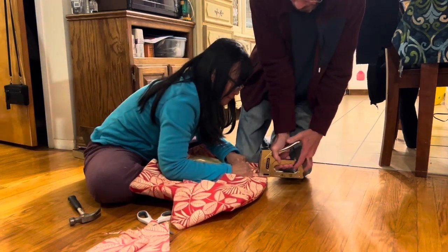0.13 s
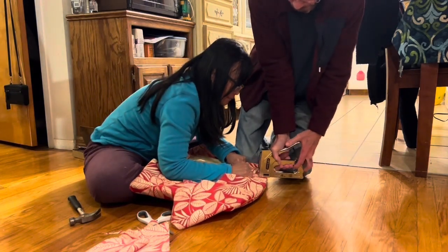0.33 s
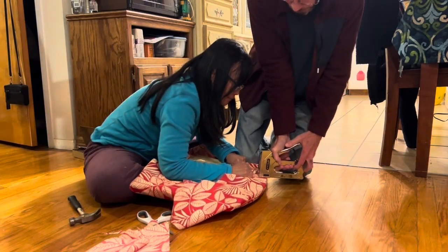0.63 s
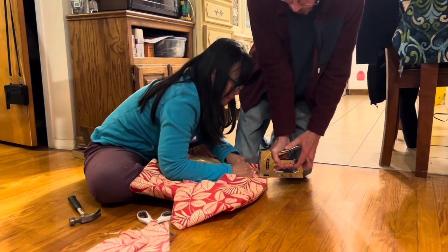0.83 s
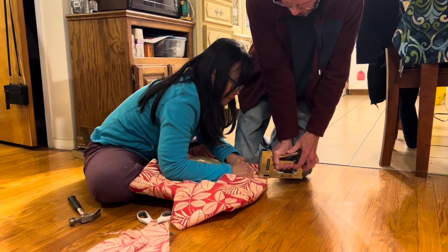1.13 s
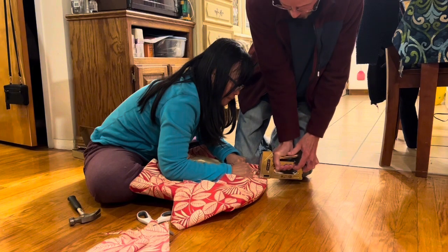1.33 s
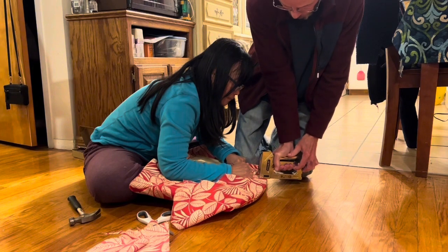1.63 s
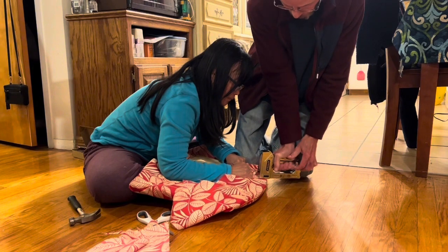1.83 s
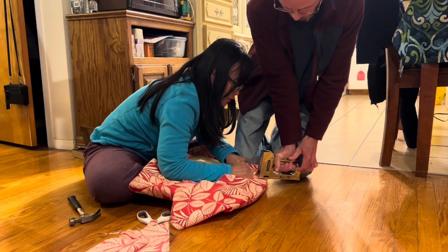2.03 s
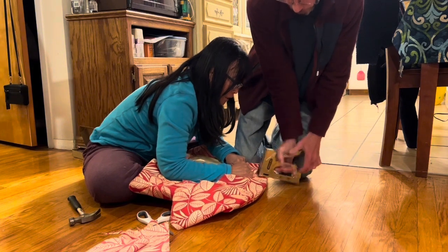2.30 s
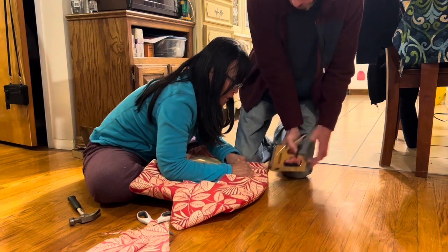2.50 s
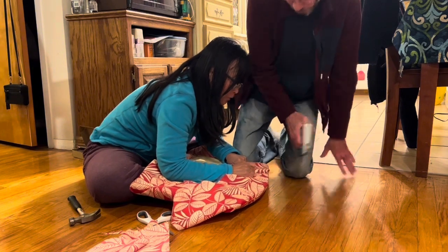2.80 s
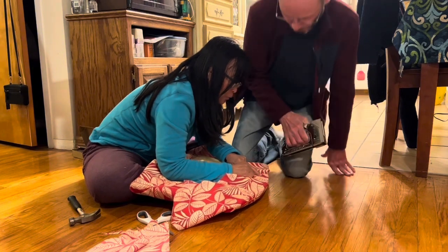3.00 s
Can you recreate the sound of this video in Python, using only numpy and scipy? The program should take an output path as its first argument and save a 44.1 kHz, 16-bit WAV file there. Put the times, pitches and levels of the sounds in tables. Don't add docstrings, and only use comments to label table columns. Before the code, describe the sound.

A hand staple gun is readied in a quiet furnished room with faint low appliance rumble. Small lever ticks come around 0.4-0.6 s, with barely audible cloth slides near 0.8 and 1.7 s. At 2.5 s the latch clicks and the blade slams, a hard crack with short steel ring and room echo. Faint clicks follow from 2.95 s; at 3.08 s the tool clunks onto boards, thudding as it rocks.

```python
import sys
import numpy as np
from scipy import signal
from scipy.fft import rfft, irfft, next_fast_len
from scipy.io import wavfile
from scipy.ndimage import uniform_filter1d, minimum_filter1d, map_coordinates

SR = 44100
rng = np.random.default_rng(int(sys.argv[2]) if len(sys.argv) > 2 else 0)


def invert_db(level):
    return 10 ** (np.asarray(level, dtype=float) / 20)


def transcribe(u):
    v = np.clip(np.atleast_2d(u).T, -1, 1)
    q = np.round(v * 32767).astype(np.int16)
    wavfile.write(sys.argv[1], SR, q)


N = 138915

EDGES = 20 * 2 ** np.arange(0, 9.9, .4)

# (frequency [Hz], level [dB])
FLOOR_COLOUR = [(20, -29), (70, 3.5), (160, -13.5), (480, -17.5), (952, -37), (3000, -48.5), (11500, -51),
                (16500, -75)]
FLOOR_DB, FLOOR_PATCHY_DB, FLOOR_PATCH_S = -57.5, .8, .1
# (frequency [Hz], width [Hz], level [dB])
FLOOR_BANDS = [(113, 9.7, -11), (207, 7, 2.5), (256, 6, -8), (306, 11, -5), (360, 8, 2), (423, 9, -5),
               (495, 10, -9), (556, 9, -8)]
FLOOR_BANDS_DB = -69
# (frequency [Hz], likeness [-1..1])
FLOOR_LIKENESS = [(60, 1), (180, 0.86), (550, 0.59), (1650, 0.25), (4970, 0.74), (15000, 0.061)]

RUSTLE_HZ, RUSTLE_DB, RUSTLE_PATCHY_DB = (990, 2650), -88.5, 2.5
# (time [s], half length [s], level over the rustle [dB], frequency [Hz])
SHIFTS = [
    (0.812, 0.06, 14.5, 3450),
    (0.816, .08, 10, 1800),
    (1.7, 0.056, 10, 3500),
]

# (time [s], level [dB], frequency [Hz], t60 [s])
PINGS = [(0.041, -59, 1750, .006), (0.513, -71, 5550, 0.097), (2.5124, -28.5, 3160, .04),
         (.367, -68, 2400, .008), (.367, -71.5, 4500, .006), (.378, -75, 2150, .03), (.539, -68, 5500, .03),
         (0.512, -53, 1330, 0.018), (0.581, -58, 1490, 0.016), (1.33, -75, 3400, 0.047),
         (1.336, -69.5, 2700, 0.033), (2.539, -35, 910, 0.032), (2.5433, -27.5, 880, 0.053),
         (2.546, -32, 5600, .02), (2.5453, -33.5, 7500, 0.028), (3.0586, -19, 1290, 0.018),
         (3.0586, -24.5, 880, .006), (3.059, -30, 2600, .006), (3.059, -32, 4700, 0.011),
         (3.0778, -9.5, 1301, 0.033), (3.0775, -14, 790, 0.025), (3.0772, -14, 2600, .012),
         (3.0769, -8, 11650, 0.01)]

# (frequency [Hz], likeness [-1..1])
ROOM_LIKENESS = [(60, 1), (240, 0.87), (950, 0.15), (3770, 0.23), (15000, 0.39)]
# (frequency [Hz], t60 [s])
ROOM_T60 = [(60, 0.16), (250, 0.35), (1000, 0.42), (4000, 0.43), (9000, 0.39), (12000, 0.25), (15000, 0.29)]
# (frequency [Hz], level [dB])
ROOM_COLOUR = [(60, -5), (300, 6), (1500, 1.5), (6000, -3), (15000, -0.5)]
ROOM_DB, ROOM_GAP_S, ROOM_EARLY_DB = -26, .0115, -9

# (time [s], peak [dB], rattle [s], tilt [dB per octave])
TICKS = [
    (.3655, -51.5, 0.0054, 9.5),
    (.5063, -43, 0.0051, 2.5),
    (.5115, -45.5, 0.0074, -2),
    (.524, -55, .006, -3),
    (.537, -58, .008, 0),
    (.556, -66, .01, 0),
    (.579, -64.5, 0.0098, -2),
]
# (frequency [Hz], level [dB])
TICK_COLOUR = [(500, -19), (1000, -4.5), (2000, 8), (4500, 2), (9000, -4), (16500, -11)]
# (frequency [Hz], level [dB], t60 [s])
TICK_RING = [(2180, 4, 0.012), (4170, 3, 0.013), (5550, -7, 0.056)]

# (time [s], length [s], from [Hz], to [Hz], level [dB])
SQUEAK = (1.55, .04, 9350, 9800, -86)

# (time [s], peak [dB], rattle [s], tilt [dB per octave])
LATCH = [
    (2.5055, -11.5, 0.0018, 4),
    (2.5075, -17.5, 0.0034, -3.5),
    (2.5125, -29.5, .003, -1),
    (2.5185, -29.5, 0.0018, -4.5),
    (2.5275, -36, .003, 4.5),
    (2.5385, -31, 0.0035, 3.5),
    (2.5435, -31.5, 0.0015, -7),
]
# (frequency [Hz], level [dB])
LATCH_COLOUR = [(300, -19.5), (800, -25), (1900, 0), (3300, 5), (5300, -2), (8500, 3), (11500, -14),
                (16500, -16.5)]
# (frequency [Hz], level [dB], t60 [s])
LATCH_RING = [(1640, -9.5, 0.096), (1880, -4, 0.094), (2270, -16.5, 0.068), (3160, -6.5, 0.059),
              (3585, -2.5, 0.047), (6900, -16, 0.068), (8360, -3.5, .04), (8300, -12.5, 0.04)]

# (time [s], peak [dB], rattle [s], tilt
# [dB per octave])
BLADE = [
    (2.5531, -7.5, 0.00042, 3.5),
    (2.5536, -6, 0.00036, 2.5),
    (2.554, -7, 0.00068, 6),
    (2.5561, -7, .001, 2.5),
    (2.558, -8, 0.00086, 0),
    (2.5598, -14.5, .001, 4.5),
    (2.5665, -12.5, .002, -0.5),
]
# (frequency [Hz], level [dB])
BLADE_COLOUR = [(60, -14.5), (300, -7), (1130, -1.5), (2500, -2.5), (4300, -6.5), (8750, -11.5),
                (12000, -10.5), (16500, -21)]
# (frequency [Hz], level [dB], t60 [s])
BLADE_RING = [(1246, 1, 0.0061), (1630, -3, 0.04), (2600, -20, 0.02), (2800, 0, .01), (3570, -5, 0.029)]
# (time [s], level [dB], frequency [Hz], t60 [s])
STRIKE = [
    (2.555, 6.5, 3186, 0.0029),
    (2.5547, 1.5, 1242, 0.0035),
]

# (time [s], level [dB])
SEAT_THUD = [
    (2.556, -36),
    (2.566, -29),
]
# (frequency [Hz], level [dB], t60 [s])
SEAT_RING = [(62, 5.5, 0.16), (105, -12.5, 0.04), (315, -11.5, 0.008), (490, -16.5, .05)]
THUD_CONTACT_HZ, THUD_LOW_HZ = 480, 68

# (frequency [Hz], level [dB], t60 [s])
FRAME_RING = [(738, -42, 0.28), (1204, -34, 0.3), (1604, -36.5, .18), (1860, -37, 0.23),
              (2380, -45.5, 0.15), (2455, -43, .18), (2730, -38, .18), (2900, -44, 0.3), (3661, -41, .16)]
FRAME_S = 2.5665

# (time [s], peak [dB], rattle [s], tilt [dB per octave])
CLICKS = [
    (2.9507, -46.5, 0.0023, -3),
    (2.9965, -51, 0.006, -0.5),
    (3.0445, -41.5, 0.013, -0.5),
    (3.0555, -27.5, 0.013, 4),
]
# (frequency [Hz], level [dB])
CLICK_COLOUR = [(700, -45.5), (2000, 0), (3500, 0.5), (6500, -6), (12000, -8.5), (16500, -20.5)]
# (frequency [Hz], level [dB], t60 [s])
CLICK_RING = [(2770, 4.5, 0.0024), (4430, -5.5, 0.0079)]

# (time [s], peak [dB], rattle [s], tilt [dB per octave])
SET_DOWN = [
    (3.0765, -5, 0.0038, 5.5),
    (3.0795, -9.5, 0.0028, 4),
    (3.083, -14, 0.0016, 2),
    (3.0868, -15.5, 0.0021, -0.5),
    (3.0905, -18, 0.0032, 7.5),
]
# (frequency [Hz], level [dB])
SET_DOWN_COLOUR = [(200, -13), (500, -7), (1300, -5.5), (2500, -5), (5000, -14), (8400, -17.5),
                   (11700, -22.5), (16500, -23.5)]
# (frequency [Hz], level [dB], t60 [s])
SET_DOWN_RING = [(827, -11.5, 0.012), (1290, -2.5, 0.012), (1877, -14, 0.013), (2720, -10.5, 0.02),
                 (3650, -14, 0.0052), (4700, -4.5, 0.012), (6500, -15, 0.0087), (8530, -13, 0.0082)]

BOARD_THUD_S = [3.0822, 3.0859, 3.0914, 3.095, 3.0993, 3.1032, 3.109, 3.1144, 3.1165, 3.1205, 3.133, 3.1455]
BOARD_THUD_DB = [-15.5, -15, -7.5, -16, -15.5, -19, -24.5, -19, -19, -19, -26, -21]
# (frequency [Hz], level [dB], t60 [s])
BOARD_RING = [(79, -25, 0.2), (113, -9.5, 0.065), (170, -10, 0.036), (241, 1.5, 0.022), (323, -1, 0.024),
              (440, -12, 0.012)]

# (frequency [Hz], left lead [radians])
PORT_LEAD = [(60, -.15), (260, -1.0), (1400, -.7), (3100, .6), (7900, 0.7), (10800, -3.8), (13200, -9),
             (16500, -12.8)]
# (frequency [Hz], left over right [dB])
PORT_BALANCE = [(60, -0.5), (180, 3.5), (550, -.5), (1650, 0), (4970, 1), (15000, -1)]
# (from [Hz], to [Hz])
DEAD_BANDS = [(9620, 10880), (13020, 14520), (15800, 17500)]
ATTACK_RISE, ATTACK_OPEN_S = 4, .005
DUCK_FROM_DB, DUCK_SHARE, DUCK_ATTACK_S, DUCK_HOLD_S, DUCK_BACK_DB_PER_S = -23.5, 0.59, 0.016, 0.14, 105
TOP, LOW_CUT_HZ, CUTOFF_HZ = .86, 35, 16900


def at_hz(points, hz):
    points = np.array(points)
    return np.interp(np.log(hz), np.log(points[:, 0]), points[:, 1])


def bands(x):
    for k, (low, high) in enumerate(zip(EDGES, EDGES[1:])):
        band_pass = signal.butter(2, [low, high], "band", fs=SR, output="sos")
        yield np.sqrt(low * high), signal.sosfilt(band_pass, x[k % len(x)])


def ring(x, modes):
    out = 0
    for hz, level_db, t60 in modes:
        r, w = invert_db(-60 / (t60 * SR)), 2 * np.pi * hz / SR
        gain = invert_db(level_db) * np.sin(w)
        out = out + signal.lfilter([0, gain], [1, -2 * r * np.cos(w), r * r], x + 1e-18)
    return out


def pair(hz, likeness, mid_side):
    alike = np.clip(at_hz(likeness, hz), -1, 1)
    return np.sqrt(1 + alike) * mid_side[0] + np.sqrt(1 - alike) * mid_side[1] * [[1], [-1]]


def coloured(x, colour, tilt_db):
    size = 2 ** 14
    hz = np.maximum(np.arange(size // 2 + 1) * SR / size, 20)
    fold = irfft(np.log(invert_db(at_hz(colour, hz) + tilt_db * np.log2(hz / 3000))))
    fold[1:size // 2] *= 2
    fold[size // 2 + 1:] = 0
    return irfft(rfft(x, size) * np.exp(rfft(fold)))[:len(x)]


def wander():
    steps = int((N + SR) / SR / FLOOR_PATCH_S) + 2
    return map_coordinates(rng.standard_normal(200), [np.linspace(0, steps, N + SR)], order=3)


def near_far(x, far_db):
    return x * invert_db(np.array([[0], [far_db]]))


def blows(events, colour, modes, ring_db, room_db):
    out, t = np.zeros((2, N + SR)), np.arange(SR // 4) / SR
    for s, level_db, rattle_s, tilt_db in events:
        contacts = rng.laplace(size=len(t)) * np.exp(-t / rattle_s) * np.minimum(t / .0003, 1)
        crack = coloured(contacts, colour, tilt_db)
        body = ring(contacts, modes)
        sound = crack / np.abs(crack).max() + invert_db(ring_db) * body / np.abs(body).max()
        even = coloured(1. * (t == 0), colour, tilt_db)
        to_room = invert_db(room_db) * (.1 * sound + even * sound.std() / even.std())
        start = int(s * SR)
        out[:, start:start + len(t)] += invert_db(level_db) * np.array([sound, to_room])
    return out[:, :N]


def taps(events):
    out = np.zeros(N)
    for s, level_db, hz, t60 in events:
        push = np.zeros(N)
        start, length = int(s * SR), int(SR / hz)
        cycle = np.sin(2 * np.pi * np.arange(length) / length)
        push[start:start + length] = -np.hanning(length) * cycle * 4 / length
        out += ring(push, [(hz, level_db, t60)])
    return out


def thuds(events, modes):
    pushes, r = np.zeros(N), np.exp(-2 * np.pi * THUD_CONTACT_HZ / SR)
    for s, level_db in events:
        pushes[int(s * SR)] = invert_db(level_db)
    soft = signal.lfilter([(1 - r) ** 2], [1, -2 * r, r * r], pushes + 1e-18)
    return signal.lfilter(*signal.butter(2, THUD_LOW_HZ, "high", fs=SR), ring(soft, modes))


def floor():
    wide, narrow = 0, 0
    for hz, band in bands(rng.standard_normal((2, 2, N + SR))):
        level = invert_db(at_hz(FLOOR_COLOUR, hz) + FLOOR_PATCHY_DB * wander())
        wide = wide + (level * pair(hz, FLOOR_LIKENESS, band))[:, SR:]
    for hz, width_hz, level_db in FLOOR_BANDS:
        band = ring(rng.standard_normal((2, N + SR)), [(hz, level_db, 2.2 / width_hz)])
        narrow = narrow + pair(hz, FLOOR_LIKENESS, band)[:, SR:] * width_hz
    return invert_db(FLOOR_DB) * wide / wide.std() + invert_db(FLOOR_BANDS_DB) * narrow / narrow.std()


def rustle():
    grains = rng.laplace(size=(2, N + SR)) * invert_db(RUSTLE_PATCHY_DB * wander())
    band_pass = signal.butter(4, RUSTLE_HZ, "band", fs=SR, output="sos")
    band = signal.sosfilt(band_pass, grains + grains[0])[:, SR:]
    out = band / band.std()
    for s, half_s, level_db, hz in SHIFTS:
        slide = ring(grains[:, SR:], [(hz, 0, .006)])
        swell = np.exp(-((np.arange(N) / SR - s) / half_s) ** 2)
        out = out + invert_db(level_db - 9) * slide / slide.std() * swell
    return invert_db(RUSTLE_DB) * out


def pings():
    return near_far(taps(PINGS), -16)


def room(x):
    t = np.arange(SR) / SR
    onset = np.where(t < ROOM_GAP_S, invert_db(ROOM_EARLY_DB) * (t > .002), 1)
    echo = 0
    for hz, band in bands(rng.standard_normal((2, 2, SR))):
        decay = invert_db(at_hz(ROOM_COLOUR, hz) - 60 * t / at_hz(ROOM_T60, hz))
        echo = echo + decay * pair(hz, ROOM_LIKENESS, band)
    return invert_db(ROOM_DB) * signal.fftconvolve(x[None], onset * echo, axes=1)[:, :N]


def ticks():
    return blows(TICKS, TICK_COLOUR, TICK_RING, ring_db=-17.0, room_db=-13.0)


def squeak():
    s, length, low_hz, high_hz, level_db = SQUEAK
    u = np.clip((np.arange(N) / SR - s) / length, 0, 1)
    phase = 2 * np.pi * np.cumsum(low_hz + (high_hz - low_hz) * u) / SR
    return invert_db(level_db) * np.sin(np.pi * u) * np.sin(phase)


def latch():
    return blows(LATCH, LATCH_COLOUR, LATCH_RING, ring_db=-9.5, room_db=-11.0)


def blade():
    slam = blows(BLADE, BLADE_COLOUR, BLADE_RING, ring_db=-10.5, room_db=0.83)
    return slam + near_far(taps(STRIKE), -16)


def seat():
    return near_far(thuds(SEAT_THUD, SEAT_RING), -7)


def frame():
    out = 0
    for mode in FRAME_RING:
        start = int((FRAME_S - rng.uniform(0, .008)) * SR)
        out = out + ring(1. * (np.arange(N) == start), [mode])
    return near_far(out, -12)


def clicks():
    return blows(CLICKS, CLICK_COLOUR, CLICK_RING, ring_db=-0.5, room_db=-6.5)


def set_down():
    return blows(SET_DOWN, SET_DOWN_COLOUR, SET_DOWN_RING, ring_db=-5.0, room_db=-7.5)


def boards():
    return near_far(thuds(zip(BOARD_THUD_S, BOARD_THUD_DB), BOARD_RING), -18)


def ports(x):
    size = next_fast_len(N + SR)
    hz = np.maximum(np.arange(size // 2 + 1) * SR / size, 20)
    half = invert_db(at_hz(PORT_BALANCE, hz) / 2) * np.exp(.5j * at_hz(PORT_LEAD, hz))
    return irfft(rfft(x, size) * np.array([half, 1 / half]), size)[:, :N]


def scene():
    tool = ticks() + clicks() + latch() + blade() + set_down()
    near, far = tool + seat() + boards() + pings() + frame() + squeak()
    reverb = room(far) * invert_db(np.array([[.3], [-.3]]))
    return ports(near) + reverb + rustle() + floor() * invert_db(np.array([[1.1], [-1.1]]))


def duck(x):
    level_db = 10 * np.log10(uniform_filter1d(np.mean(x ** 2, axis=0), size=128) + 1e-12)
    over = DUCK_SHARE * np.maximum(level_db - DUCK_FROM_DB, 0)
    hold = int(DUCK_HOLD_S * SR)
    held = -minimum_filter1d(-np.r_[np.zeros(hold), over], size=hold)[hold // 2:hold // 2 + N]
    slope = DUCK_BACK_DB_PER_S * np.arange(N) / SR
    cut_db = np.maximum.accumulate(held + slope) - slope
    r = np.exp(-1 / (DUCK_ATTACK_S * SR))
    return x * invert_db(-signal.lfilter([1 - r], [1, -r], cut_db))


def empty_bands(x):
    notched, bright = x, np.gradient(x[0]) ** 2
    for edges in DEAD_BANDS:
        notch = signal.ellip(5, .5, 50, edges, "bandstop", fs=SR, output="sos")
        notched = signal.sosfilt(notch, notched)
    usual = signal.lfilter([.001], [1, -.999], bright)
    attack = uniform_filter1d(bright, size=128) > ATTACK_RISE * usual
    opened = -minimum_filter1d(-1. * attack, size=int(ATTACK_OPEN_S * SR))
    return notched + uniform_filter1d(opened, size=128) * (x - notched)


def low_pass(x):
    return signal.sosfilt(signal.butter(12, 16990, fs=SR, output="sos"), x)


def record(dry):
    x = TOP * np.tanh(duck(dry) / TOP)
    x = np.concatenate([x[:, SR // 4:0:-1], x], axis=1)
    x = signal.sosfilt(signal.cheby2(12, 70, CUTOFF_HZ, fs=SR, output="sos"), x)
    x = empty_bands(x)
    mix = signal.sosfilt(signal.butter(4, LOW_CUT_HZ, "high", fs=SR, output="sos"), x)[:, SR // 4:]
    return low_pass(mix)


dry = scene()
out = record(dry)
transcribe(out)
```